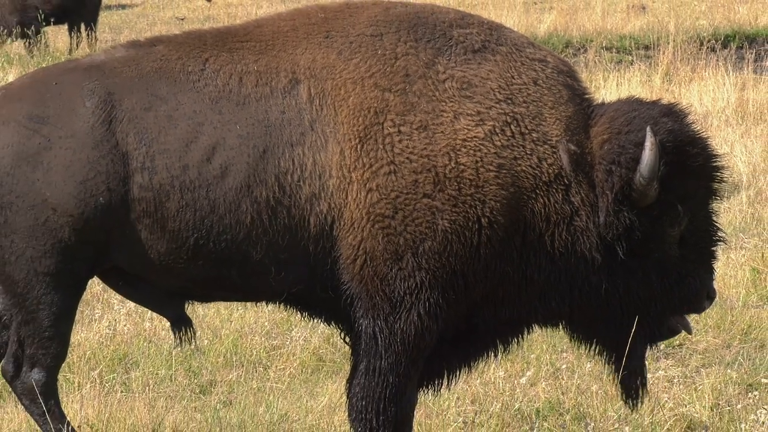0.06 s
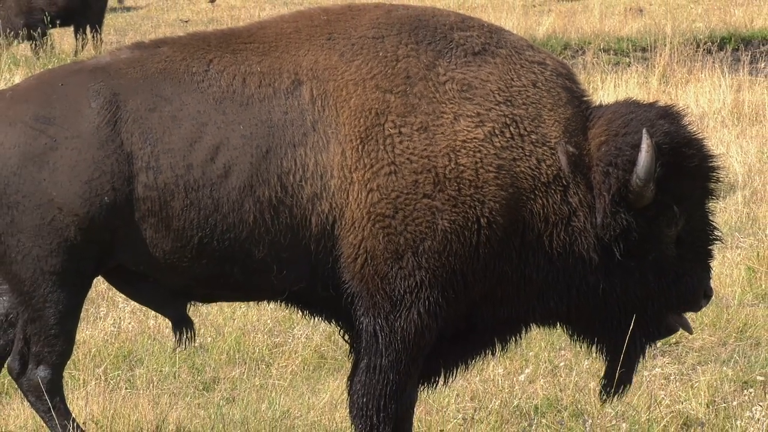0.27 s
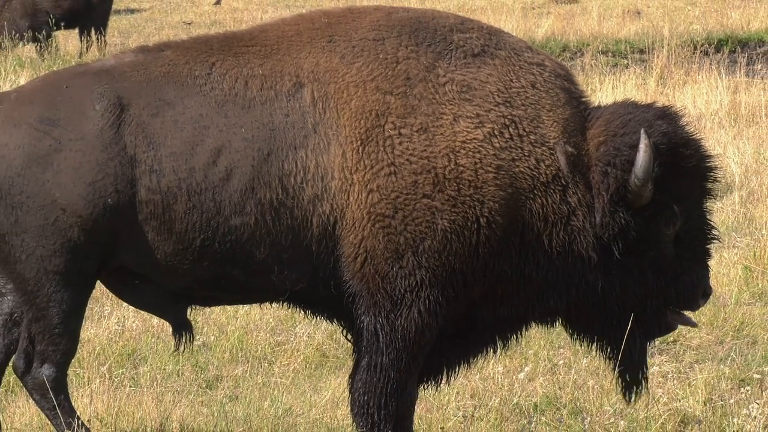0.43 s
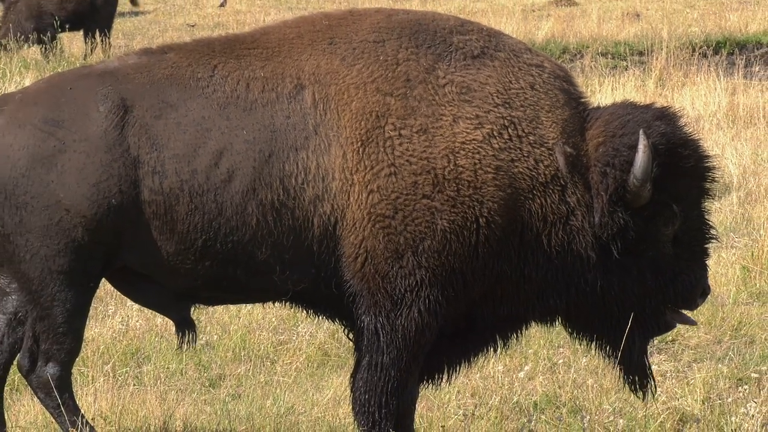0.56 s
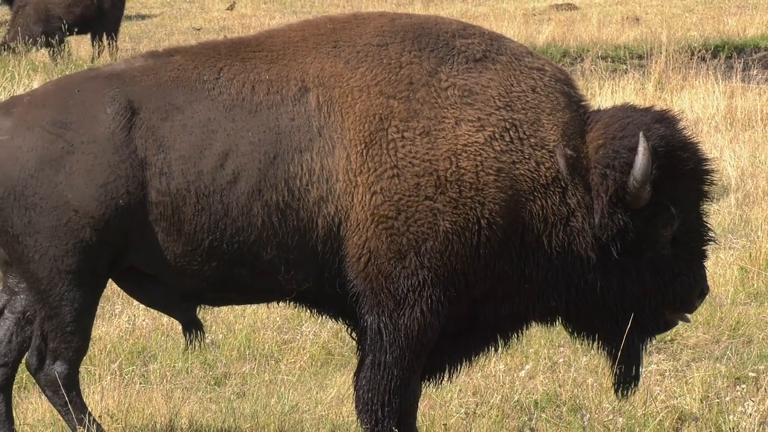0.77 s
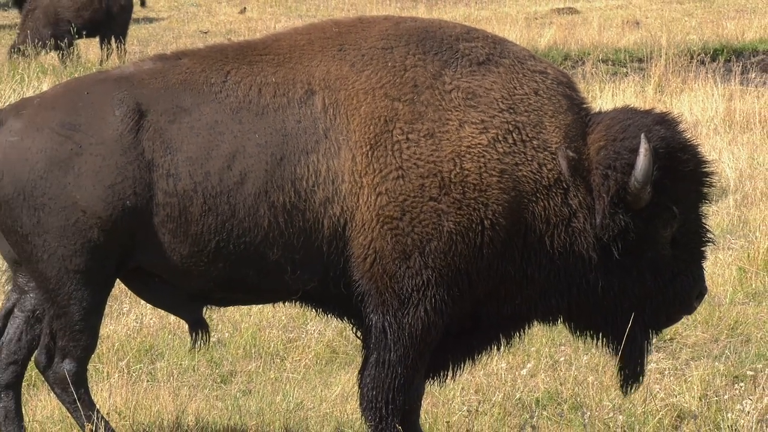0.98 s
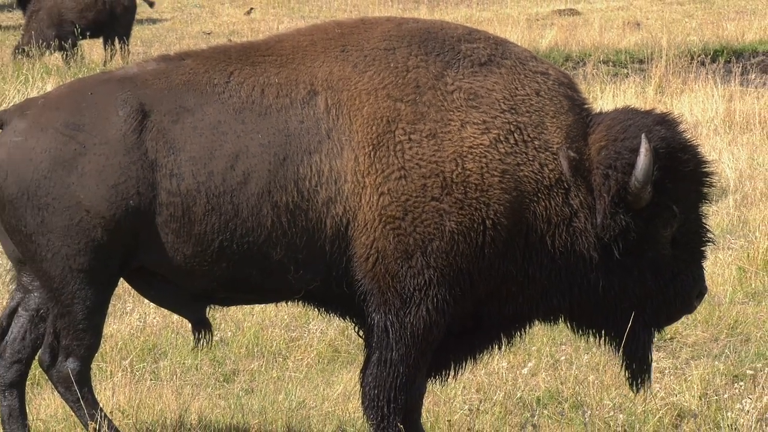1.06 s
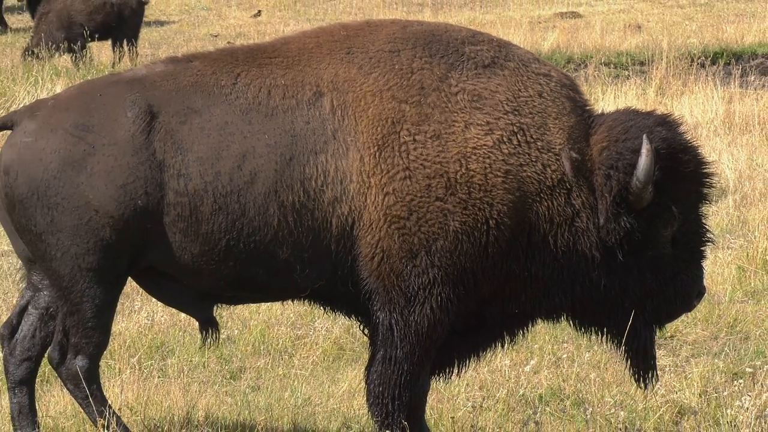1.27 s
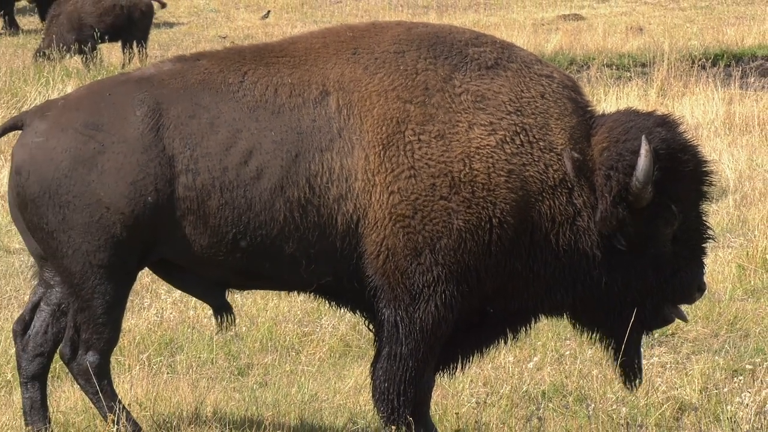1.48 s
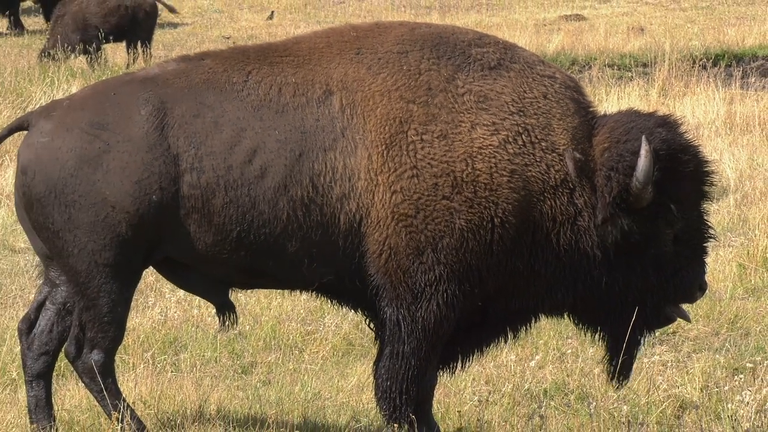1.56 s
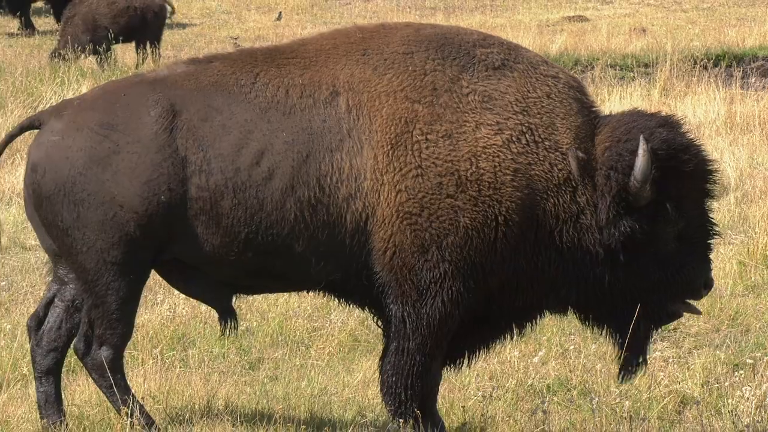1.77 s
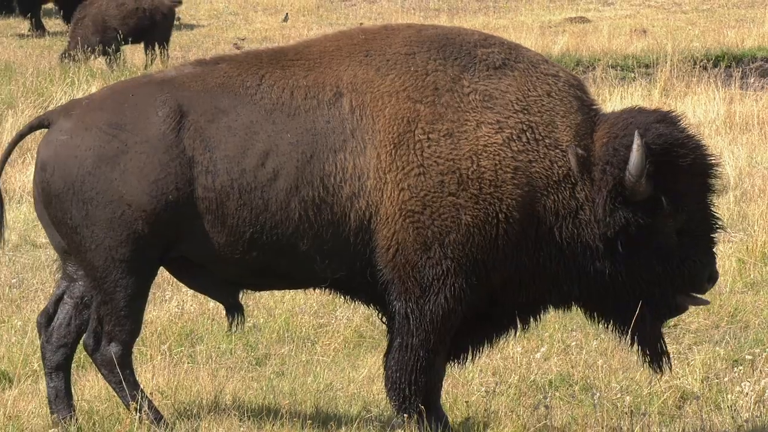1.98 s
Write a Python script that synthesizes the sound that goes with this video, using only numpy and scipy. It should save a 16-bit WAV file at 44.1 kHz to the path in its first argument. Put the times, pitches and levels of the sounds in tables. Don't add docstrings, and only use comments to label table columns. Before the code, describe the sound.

Two loud, guttural bison grunts about a second and a half apart, overloading the left side of a stereo microphone outdoors, with softer distant growling, low herd rumble, thin air hiss, tiny chips and a faint far engine.

```python
import sys
import numpy as np
from scipy import signal
from scipy.io import wavfile

SR = 44100
rng = np.random.default_rng(int(sys.argv[2]) if len(sys.argv) > 2 else 0)


def convert_level_to_amplitude(level_db):
    exponent = np.asarray(level_db, float) / 20
    return 10 ** exponent


def to_wav(s):
    ch = np.atleast_2d(s).T
    pcm = np.round(np.clip(ch, -1, 1) * 32767)
    wavfile.write(sys.argv[1], SR, pcm.astype(np.int16))


N = 88200


def rms_one(x):
    return x / np.sqrt(np.mean(x ** 2) + 1e-20)


def in_time(rows):
    s, *columns = np.transpose(rows)
    return [np.interp(np.arange(N) / SR, s, c) for c in columns]


def at_hz(points, hz):
    table_hz, value = np.array(points).T
    return np.interp(np.log(hz), np.log(table_hz + 1), value)


def drift(rate_hz):
    r = np.exp(-80 * np.pi * rate_hz / SR)
    slow = signal.lfilter([1], [1, -2 * r, r * r], rng.standard_normal(N // 40 + 2002))[2000:]
    return np.interp(np.arange(N) / 40, np.arange(len(slow)), rms_one(slow))


def turning(hz):
    return 2 * np.pi * np.cumsum(hz) / SR


def since(start_s):
    t = np.arange(N) / SR - start_s
    return np.maximum(t, 0), t >= 0


def hump(t, length_s):
    return np.sin(np.pi * np.clip(t / length_s, 0, 1))


def butter(x, order, hz, kind="low"):
    return signal.sosfilt(signal.butter(order, hz, kind, fs=SR, output="sos"), x + 1e-18)


def tract(x, peaks):
    out = 0
    for k, (hz, width_hz, level_db) in enumerate(peaks):
        r = np.exp(-np.pi * width_hz / SR)
        poles = [1, -2 * r * np.cos(2 * np.pi * hz / SR), r * r]
        out = out + (-1) ** k * convert_level_to_amplitude(level_db) * signal.lfilter([1 - r, 0, r - 1], poles, x + 1e-18)
    return out


def pan(x, left_right_db):
    return np.array([x, x * convert_level_to_amplitude(-left_right_db)])


CHEST_HZ, CHEST_T60_S = 172, 0.07
OPEN_DROP, OPEN_S = 0.16, 0.005
SHUT_S, CRACK_T60_S, CRACK_LAG_S = 0.006, 0.007, 0.0011


def pulse(start_s, level_db, throat_hz, t60_s, held_s, crack_db, rise_s, chest_db):
    t, on = since(start_s)
    shut = np.sin(np.pi / 2 * np.clip((held_s - t) / SHUT_S + 1, 0, 1)) ** 2
    opened_t = t - OPEN_DROP * OPEN_S * (1 - np.exp(-t / OPEN_S))
    throat = np.sin(2 * np.pi * throat_hz * opened_t) * convert_level_to_amplitude(-60 * t / t60_s)
    chest = convert_level_to_amplitude(chest_db - 60 * t / CHEST_T60_S) * np.sin(2 * np.pi * CHEST_HZ * t)
    ring = convert_level_to_amplitude(level_db) * on * shut * (throat + chest) * (1 - np.exp(-t / rise_s))
    late_t, struck = since(start_s + CRACK_LAG_S)
    rough = 0.51 + 0.37 * rng.standard_normal(N)
    return ring, struck * convert_level_to_amplitude(crack_db - 60 * late_t / CRACK_T60_S) * rough


# start_s, period_s, pulse_count, peak_db, throat_hz
GRUNTS = [
    (.0566, .0226, 8, 2.8, 222),
    (1.4613, .0213, 8, 3, 230),
]
# start_s, level_db, held_s, crack_db, left_right_db
CLOSERS = [
    (.2518, -8, 0.0024, -26, 10),
    (0.2613, 10.5, 0.033, 8.5, 15.5),
    (0.3053, -4.5, 0.032, 3, 17),
    (1.6608, -1, 0.0304, -8, 15),
    (1.7008, -9.5, 0.047, 4.5, 19),
]
CLOSER_T60_S = [0.089, 0.29, 0.27, 0.22, 0.093]
# centre_hz, width_hz, level_db
MOUTH = [(561, 20, -4.5), (882, 70, 1.5), (1125, 174, -1.5), (1418, 89, -0.5), (1670, 150, -9.5),
         (2287, 87, -11.5), (2567, 150, -16.5), (4500, 6100, -39)]
# time_s, level_db
BREATH_ONE = [(0, -48), (.09, -30), (0.158, -23.5), (.24, -26), (0.298, -17.5), (0.329, -28),
              (0.377, -15.5), (.42, -37.5), (.55, -35.5)]
# time_s, level_db
BREATH_TWO = [(1.5, -25.5), (1.595, -24.5), (1.612, -15.5), (1.629, -30), (1.652, -17), (1.673, -38),
              (1.688, -20), (1.784, -22), (1.832, -36)]
PEAK_AT, SWELL_DB_PER_S, SAG_HZ_PER_S = [0.99, 0.72], [62, 125], [20, 190]
LAST_HELD_PERIODS, LAST_LATE_S = [1.15, 1.6], [0.0007, 0.0016]
RING_GROWTH, CHEST_DB = [3.0, 1.4], [-7, -14]
FADE_DB_PER_S, OPEN_SHARE, RISE_S = 130, 0.72, 0.001
RING_START_S, RING_END_S, BODY_BAND_HZ = 0.06, 0.22, (90, 300)
PULSE_CRACK_DB, BULL_PAN_DB = -11, 15.5
PUFF_DB, PUFF_T60_S, PUFF_FROM = -25, 0.068, 2
FLUTTER_DB, FLUTTER_HZ = 2, 40
CLOSER_HZ, CRACK_CUT_HZ, CLOSER_CHEST_DB = 221.5, 1900, [-9, -16, -10, -16, 2]


def bull():
    body, air = np.zeros((2, N)), np.zeros((2, N))
    per_grunt = zip(GRUNTS, SWELL_DB_PER_S, PEAK_AT, LAST_HELD_PERIODS, LAST_LATE_S, SAG_HZ_PER_S,
                    RING_GROWTH, CHEST_DB)
    for (first_s, period_s, count, peak_db, hz), swell, peak_at, last, late_s, sag, growth, chest_db in per_grunt:
        for k in range(int(count)):
            share = k / (count - 1)
            is_last = share == 1
            past_s = (share - peak_at) * period_s * (count - 1)
            level_db = peak_db + min(swell * past_s, -FADE_DB_PER_S * past_s)
            t60_s = RING_START_S + (RING_END_S - RING_START_S) * share ** growth
            held_s = period_s * (last if is_last else OPEN_SHARE)
            puffs = k >= PUFF_FROM
            crack_db = PULSE_CRACK_DB - 90 * (not puffs)
            start_s = first_s + k * period_s
            ring, crack = pulse(start_s + late_s * is_last, level_db, hz - sag * abs(past_s),
                                t60_s, held_s, crack_db, RISE_S, chest_db)
            t, on = since(start_s + CRACK_LAG_S)
            puff = puffs * on * convert_level_to_amplitude(PUFF_DB - 60 * t / PUFF_T60_S) * rng.standard_normal(N)
            body += pan(ring, BULL_PAN_DB)
            air += pan(crack + puff, BULL_PAN_DB)
    for row, t60_s, chest_db in zip(CLOSERS, CLOSER_T60_S, CLOSER_CHEST_DB):
        start_s, level_db, held_s, crack_db, left_right_db = row
        ring, crack = pulse(start_s, level_db, CLOSER_HZ, t60_s, held_s, crack_db, RISE_S / 2, chest_db)
        body += pan(ring, left_right_db)
        air += pan(butter(crack, 4, CRACK_CUT_HZ), left_right_db)
    between = [(.7, -97), (1.3, -90), (1.45, -43)]
    breath_db, = in_time([(-1, -90)] + BREATH_ONE + between + BREATH_TWO + [(1.9, -73)])
    breath = convert_level_to_amplitude(breath_db + FLUTTER_DB * drift(FLUTTER_HZ)) * rng.standard_normal(N)
    air += pan(breath, BULL_PAN_DB)
    return butter(body, 1, BODY_BAND_HZ, "band") + convert_level_to_amplitude(10.5) * tract(air, MOUTH)


# start_s, length_s, centre_hz, level_db
NOSE = [
    (0.302, 0.023, 850, -28.5),
    (0.373, 0.028, 1750, -32.5),
    (1.681, 0.021, 897, -22.5),
    (1.763, 0.049, 1720, -30),
]
NOSE_WIDTH_HZ = 55


def nose():
    out = np.zeros(N)
    for start_s, length_s, hz, level_db in NOSE:
        t, on = since(start_s)
        blow = on * hump(t, length_s) * rng.standard_normal(N)
        ring = tract(blow, [(hz, NOSE_WIDTH_HZ, 0)])
        out += convert_level_to_amplitude(level_db) * ring / np.abs(ring).max() * 2
    return pan(out, BULL_PAN_DB)


# time_s, pulse_hz, level_db, throat_hz
GROWL = [(.36, 48, -19.5, 160), (0.449, 46.17, -19.5, 145), (0.491, 40.75, -16, 77),
         (0.564, 58.83, -18, 225), (0.649, 52.35, -14.5, 208), (.735, 51.4, -13.5, 155),
         (0.793, 42.1, -22.5, 132), (.86, 44.5, -37, 218), (.93, 42.3, -54, 201)]
GROWL_JITTER, GROWL_GAIN_DB, GROWL_PAN_DB = 0.01, 0.5, 19
FAR_WIDTH_HZ, FAR_LOW_HZ, FAR_LOW_DB, FAR_HIGH_DB = 21.5, 104, -12, -17


def far_bull():
    first, last = GROWL[0], GROWL[-1]
    before, after = (.3, first[1], -73, first[3]), (0.81, last[1], -105, last[3])
    rate_hz, level_db, throat_hz = in_time([before] + GROWL + [after])
    phase = turning(rate_hz * (1 + GROWL_JITTER * drift(13)))
    peaks = [(throat_hz, 0), (FAR_LOW_HZ, FAR_LOW_DB), (2 * throat_hz, FAR_HIGH_DB)]
    out = 0
    for k in range(1, 11):
        lift = sum(convert_level_to_amplitude(db) / (1 + ((k * rate_hz - hz) / FAR_WIDTH_HZ) ** 2) for hz, db in peaks)
        out = out + lift * convert_level_to_amplitude(drift(5)) * np.sin(k * phase)
    return pan(convert_level_to_amplitude(level_db + GROWL_GAIN_DB) * out, GROWL_PAN_DB)


# start_s, length_s, start_hz, end_hz, level_db
HERD_GRUNTS = [(1.3, .07, 186, 130, -23), (.43, .06, 110, 135, -32), (1.1, 0.033, 120, 95, -17),
               (1.046, 0.049, 160, 120, -30), (1.094, 0.2, 196, 203, -29), (1.261, 0.072, 160, 133, -21.5),
               (1.26, 0.1, 150, 155, -29), (1.773, 0.068, 160, 142, -21.5), (1.442, 0.054, 100, 89, -19)]
# start_s, length_s, pitch_hz, level_db
SEEPS = [
    (1.548, 0.033, 4500, -44.5),
    (1.587, 0.057, 6800, -51),
    (1.636, .02, 10900, -50),
]


def herd_grunts():
    out = np.zeros(N)
    steady = [(start_s, length_s, hz, hz, level_db) for start_s, length_s, hz, level_db in SEEPS]
    for start_s, length_s, start_hz, end_hz, level_db in HERD_GRUNTS + steady:
        t, on = since(start_s)
        phase = turning(start_hz + (end_hz - start_hz) * np.clip(t / length_s, 0, 1))
        out += convert_level_to_amplitude(level_db + 1.8 * drift(40)) * on * hump(t, length_s) * np.sin(phase)
    return pan(out, 13.5)


# start_s, length_s, start_hz, end_hz, level_db
CHIPS = [
    (0.236, 0.071, 9740, 8000, -40.5),
    (0.562, 0.082, 11500, 8880, -47.5),
    (1.516, 0.065, 10500, 8530, -39.5),
    (1.871, 0.062, 9020, 7660, -40.5),
]
# time_s, pitch_hz, level_db
WHISTLE = [(.49, 2870, -50), (0.516, 4550, -55), (.535, 6020, -47.5), (0.552, 5980, -50.5),
           (0.565, 5530, -47)]
GLIDE_S, END_FALL = [0.012, 0.01, 0.0074, 0.0095], [0.35, 0.03, 0.34, 0.4]
UPPER_RATIO, UPPER_DB, CHIP_PAN_DB, WHISTLE_TRILL_HZ = 1.085, -6, 14, 83


def birds():
    out = np.zeros(N)
    for (start_s, length_s, start_hz, end_hz, level_db), glide_s, end_fall in zip(CHIPS, GLIDE_S, END_FALL):
        t, on = since(start_s)
        opening = (1 - end_fall) * np.exp(-t / glide_s)
        ending = end_fall * (1 - np.minimum(t / length_s, 1) ** 1.7)
        phase = turning(end_hz + (start_hz - end_hz) * (opening + ending))
        shape = on * np.maximum(hump(t, length_s), 0) ** 0.52 * convert_level_to_amplitude(level_db + 2.8 * drift(160))
        out += shape * (np.sin(phase) + convert_level_to_amplitude(UPPER_DB) * np.sin(UPPER_RATIO * phase))
    before, after = (.48, WHISTLE[0][1], -100), (.572, WHISTLE[-1][1], -100)
    hz, level_db = in_time([before] + WHISTLE + [after])
    trill_db = 5 * np.sin(2 * np.pi * WHISTLE_TRILL_HZ * np.arange(N) / SR) + 3 * drift(69)
    out += convert_level_to_amplitude(level_db + trill_db) * np.sin(turning(hz * (1 + .06 * drift(150))))
    return pan(out, CHIP_PAN_DB)


# start_s, level_db, centre_hz
TICKS = [(.412, -37, 4950), (0.472, -38, 4930), (.587, -36, 3500), (0.903, -41, 6500), (0.926, -32.5, 5000),
         (1.101, -39, 6650), (1.127, -44.5, 6000), (1.257, -35, 1400), (1.272, -36, 1485),
         (1.301, -42, 5280), (1.319, -20, 1470), (1.324, -49, 4500), (1.341, -23, 1300),
         (1.35, -27.5, 2200), (1.531, -33, 4020), (1.613, -38.5, 4500), (1.651, -34, 4930),
         (1.804, -48, 4960), (1.825, -37, 5000)]
# start_s, length_s, level_db
RUSTLES = [
    (0.44, 0.081, -46),
    (1.04, 0.18, -55),
    (1.282, 0.086, -47),
    (1.594, .03, -42.5),
    (1.931, 0.032, -45),
]
TICK_S, RUSTLE_HZ = 0.0033, (400, 2500)


def grass():
    out = np.zeros(N)
    for start_s, level_db, hz in TICKS:
        t, on = since(start_s)
        snap = on * convert_level_to_amplitude(level_db + 7 - 60 * t / TICK_S / 3) * rng.standard_normal(N)
        out += tract(snap, [(hz, hz * 0.35, 0)])
    grains = rng.standard_normal(N) * convert_level_to_amplitude(2.5 * np.clip(drift(120), -1.5, 1.5))
    grains = rms_one(butter(grains, 1, RUSTLE_HZ, "band"))
    for start_s, length_s, level_db in RUSTLES:
        t, on = since(start_s)
        out += convert_level_to_amplitude(level_db) * on * hump(t, length_s) * grains
    return pan(out, 10)


# cycle_multiple, right_rms_db, left_right_db
ORDERS = [(6, -63, -13), (9, -72, 9.5), (12, -43, 10), (15, -50.5, 12.5), (17, -61.5, -2), (18, -46, 8.5),
          (19, -43, -13), (22, -51, 12), (23, -39.5, 6), (24, -48, 14), (26, -53.5, 10), (27, -52, -28),
          (28, -38, 9.5), (29, -41, 2), (33, -40.5, -6.5), (35, -40, -6.5), (36, -46.5, -18.5),
          (42, -57, 7.5), (55, -56.5, -7.5), (68.38, -50, 2), (66.23, -53, -0.5), (75.44, -55.5, 7)]
CYCLE_HZ, CYCLE_WANDER, CYCLE_START_S = 5.833, 0.004, 0.1
SPREAD_RAD, LEFT_LAG_RAD, ENGINE_WOBBLE_DB = 0.007, 1.44, 4


def engine():
    cycle = turning(CYCLE_HZ * (1 + CYCLE_WANDER * drift(0.77))) - 2 * np.pi * CYCLE_HZ * CYCLE_START_S
    family_rad, out = rng.uniform(0, 2 * np.pi, 6), 0
    for order, level_db, left_right_db in ORDERS:
        whole = round(order)
        phase = whole * cycle - SPREAD_RAD * (whole - 24) ** 2 + family_rad[whole % 6]
        pair = np.array([convert_level_to_amplitude(left_right_db) * np.sin(phase - LEFT_LAG_RAD), np.sin(phase)])
        out = out + convert_level_to_amplitude(level_db + 2.5 + ENGINE_WOBBLE_DB * drift(2.6)) * pair
    return out


# centre_hz, left_right_db
TILT = [(60, 12.5), (180, 13), (550, 10), (1650, 8), (4970, 3), (15000, 4.5)]
# centre_hz, likeness [-1..1]
LIKENESS = [(30, 0.54), (70, 0.067), (150, 0.057), (500, 0.086), (2000, 0.033), (12000, 0.01)]
HERD_PATCH_DB = 3


def banded_noise(spectrum):
    out, edges_hz = 0, 21 * 2 ** np.arange(0, 9.8, .5)
    white = rng.standard_normal((2, 2, N + 8192))
    for k, (low_hz, high_hz) in enumerate(zip(edges_hz, edges_hz[1:])):
        mid, side = butter(white[k % 2], 2, [low_hz, high_hz], "band")[:, -N:]
        hz = np.sqrt(low_hz * high_hz)
        alike = np.clip(at_hz(LIKENESS, hz), -1, 1)
        inside = spectrum[0][0] <= hz <= spectrum[-1][0]
        flicker_db = HERD_PATCH_DB * (hz < 2500) * drift(5.1)
        gain = inside * convert_level_to_amplitude(at_hz(spectrum, hz) + flicker_db)
        pair = np.sqrt(1 + alike) * mid + np.sqrt(1 - alike) * side * [[1], [-1]]
        out = out + gain * pair * convert_level_to_amplitude([[0], [-at_hz(TILT, hz)]])
    return out / np.std(out[0])


# centre_hz, density_db [dB per Hz]
HERD = [(12, -53), (20, -19), (70, 1), (129, -3), (209, -1.5), (237, -2.5), (318, -13), (736, -18),
        (3000, -39.5), (3900, -126), (6600, -120)]
# time_s, level_db
STIR = [(0, -1.5), (.35, 4), (.55, 0.5), (.8, 0.4), (.95, -1.2), (1.07, 3), (1.17, -0.5), (1.3, -1),
        (1.45, 0.7), (1.7, 4.1), (1.88, 0.5), (2, -0.5)]
HERD_DB = -26


def herd_rumble():
    return convert_level_to_amplitude(HERD_DB + in_time(STIR)[0]) * banded_noise(HERD)


# centre_hz, density_db [dB per Hz]
AIR = [(1470, -52), (2500, 2), (5660, -2.5), (7280, -3.5), (15100, -4.5), (16400, -14)]
AIR_DB = -49.5


def meadow_air():
    return convert_level_to_amplitude(AIR_DB) * banded_noise(AIR)


def scene():
    animals = bull() + nose() + far_bull() + herd_grunts() + birds()
    return animals + grass() + engine() + herd_rumble() + meadow_air()


def band_limit(x):
    return signal.sosfilt(signal.butter(12, 16500, fs=SR, output="sos"), x)


def record(dry):
    top_cut = signal.cheby2(10, 50, 16850, fs=SR, output="sos")
    cut = signal.sosfilt(top_cut, np.clip(dry, -1, 1))
    return band_limit(np.clip(cut, -1, 1))


dry = scene()
out = record(dry)
to_wav(out)
```